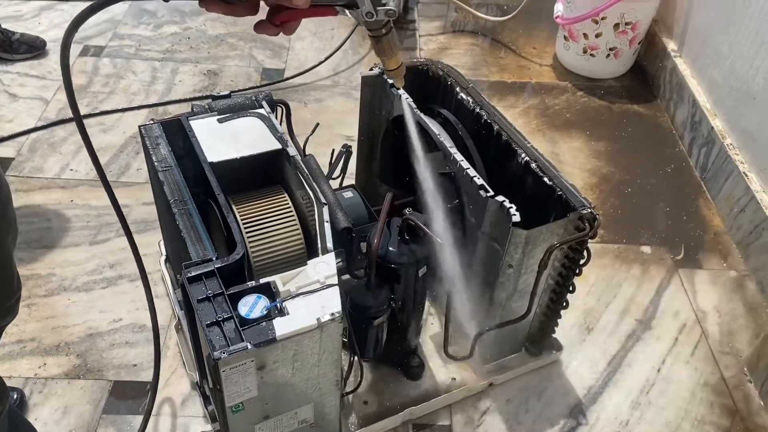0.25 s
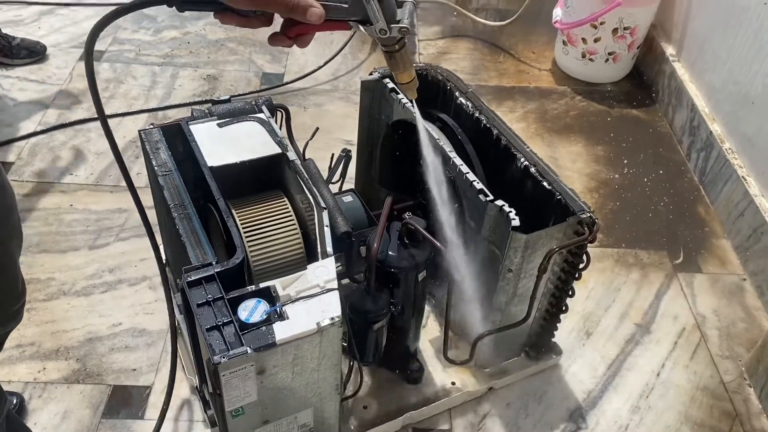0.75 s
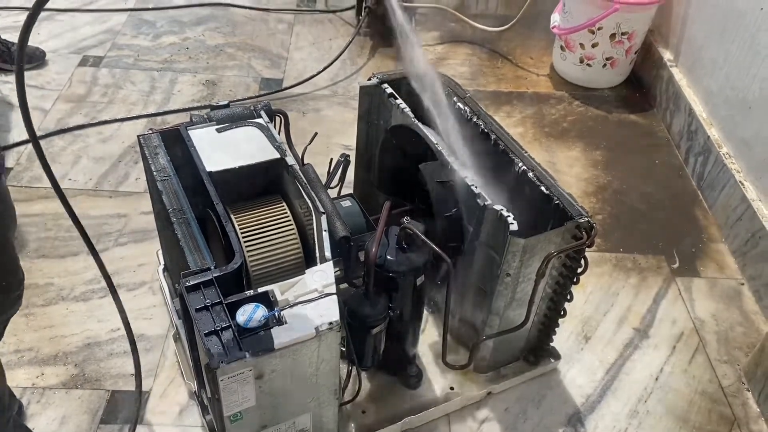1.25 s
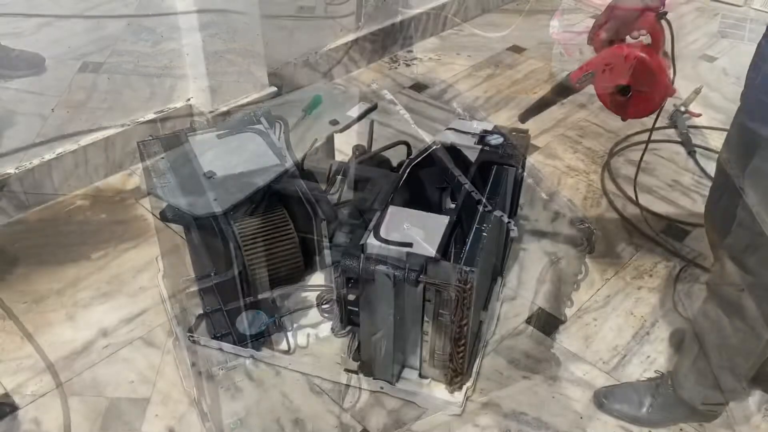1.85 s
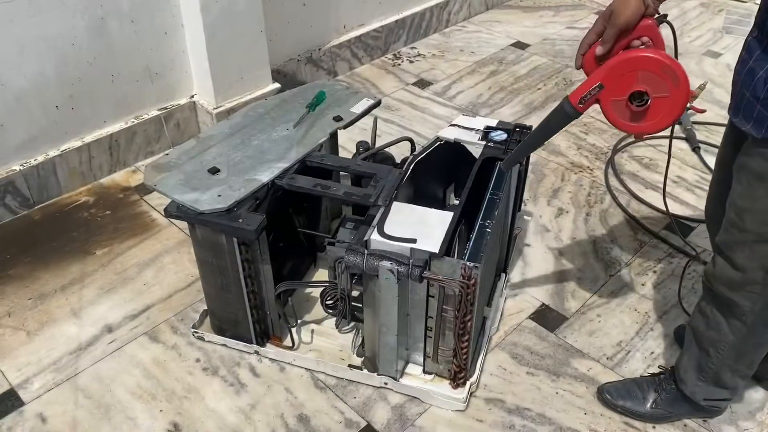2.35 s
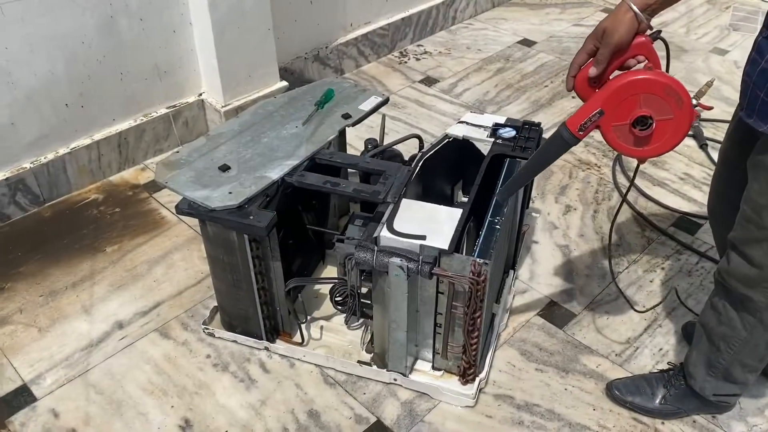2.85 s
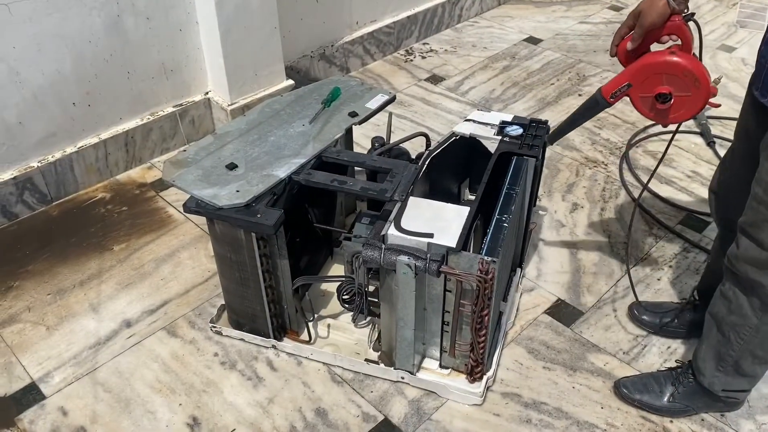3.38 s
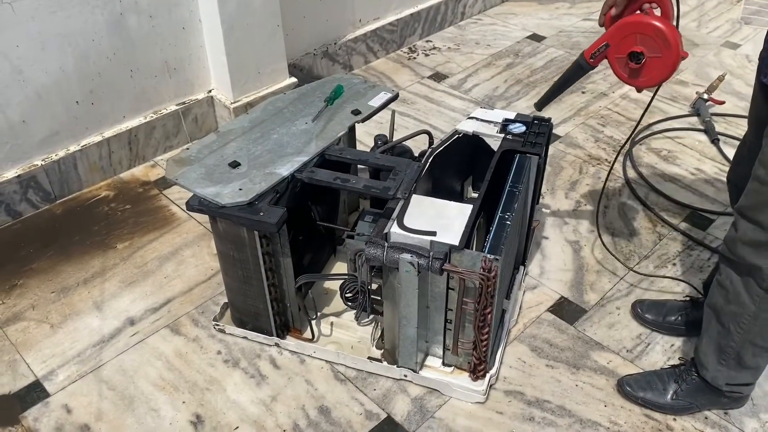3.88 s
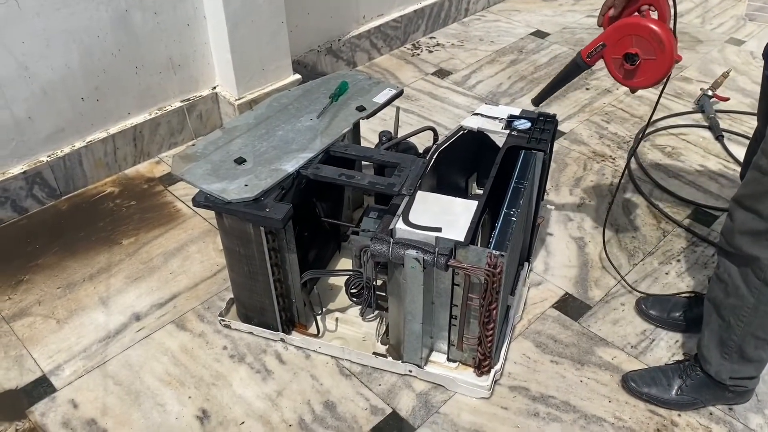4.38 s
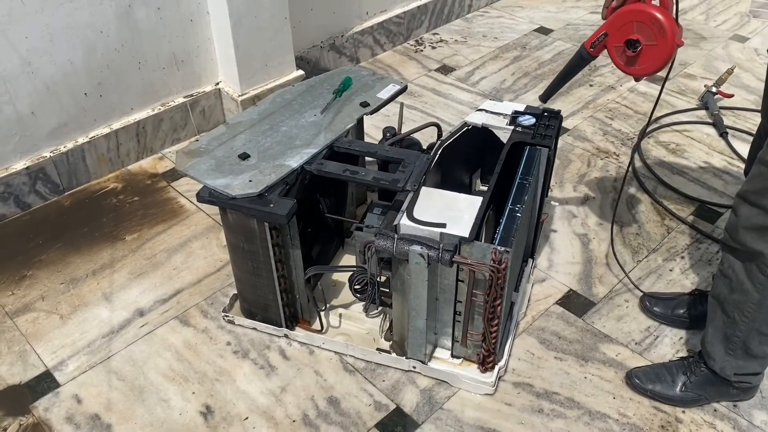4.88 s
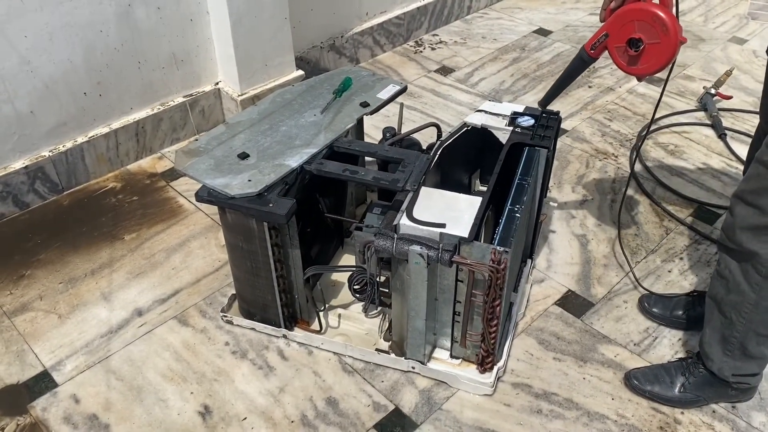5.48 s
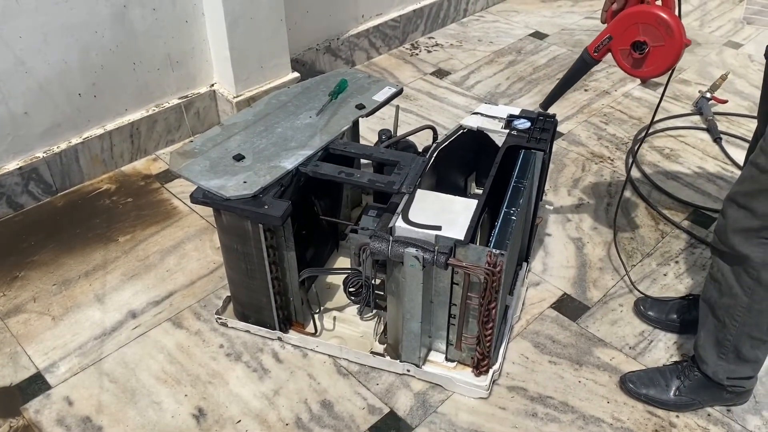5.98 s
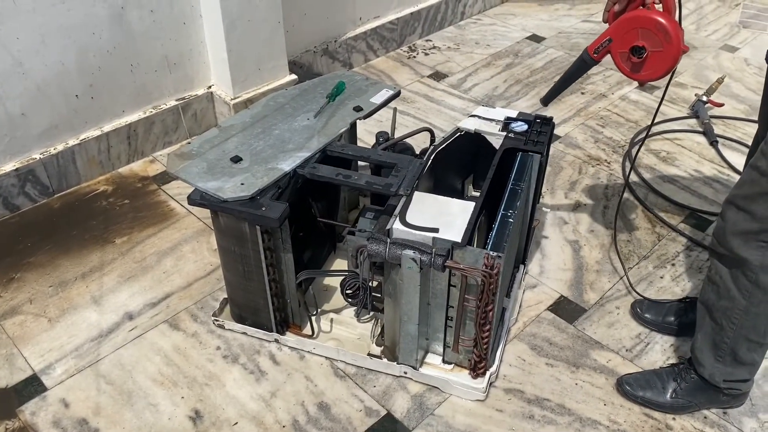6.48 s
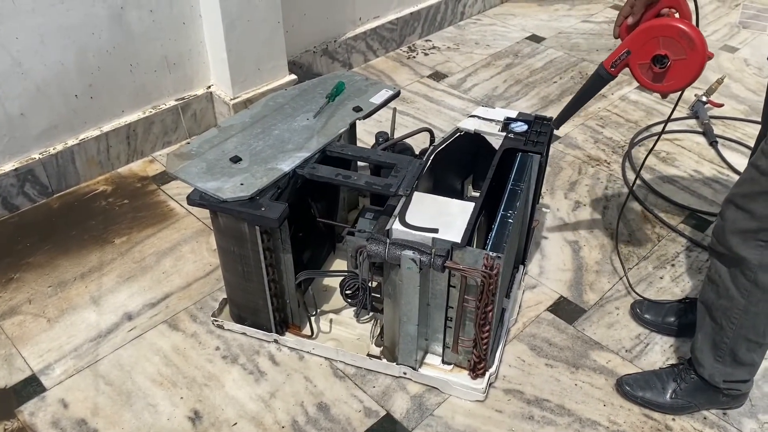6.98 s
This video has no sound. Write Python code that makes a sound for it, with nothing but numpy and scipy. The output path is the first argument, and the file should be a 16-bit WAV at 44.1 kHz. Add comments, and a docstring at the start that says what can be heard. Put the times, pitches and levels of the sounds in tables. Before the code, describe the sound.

A pressurized water jet hisses and splashes over a metal-finned appliance, then crossfades into a handheld electric blower's steady hum, whine and rushing air.

```python
"""Tiled floor among walls: a water jet sprays an appliance, then fades over to a handheld blower drying it.
Jet: shaped noise fizzes, splashes and drums; sweeps and water slugs ring the modes of a rim.
Blower: sines at shaft orders hum and whine (ten blades); noise makes rush, hiss, roar, rumble and gusts.
Faint treble noise runs throughout. The level drops out twice, very briefly."""
import sys
import numpy as np
from scipy import signal
from scipy.fft import rfft, irfft
from scipy.io import wavfile
from scipy.ndimage import uniform_filter1d

SR = 44100
rng = np.random.default_rng(int(sys.argv[2]) if len(sys.argv) > 2 else 0)


def store_wav(level_fs):
    """Save 16-bit WAV to argv[1]."""
    pcm = np.round(np.clip(np.atleast_2d(level_fs), -1, 1) * 32767)
    wavfile.write(sys.argv[1], SR, pcm.T.astype(np.int16))


N = 318843

# Noise spectra, relative: pitch_hz, level_db_per_hz
FIZZ = [(1470, -28), (2500, -5), (2750, -12), (3430, -10), (4430, -9), (6200, -10), (8300, -23.5),
        (10800, -99), (18300, -120)]
SPLASH = [(180, -46), (300, -6), (490, -3.5), (648, -7), (721, -4.5), (935, -6.5), (1360, -8),
          (3000, -19.5), (3900, -48), (6600, -120)]
DRUM = [(15, -48), (25, -29), (59, -7.5), (151, 1), (215, -4), (254, -4.5), (350, -24), (460, -42),
        (770, -120)]
RUSH = [(500, -51), (800, -22), (1000, -6), (1500, 1.5), (2000, 0.5), (2120, -7.5), (2300, 1), (2700, -5.5),
        (3000, -7), (4000, -46), (6000, -100)]
HISS = [(1680, -30.5), (2850, -4), (2890, -7.5), (3120, -2), (3530, -8.5), (3950, -8.5), (4400, -13.5),
        (4790, -15), (5240, -13.5), (5650, -15), (5750, -16), (7940, -23), (8300, -29.5), (10800, -111),
        (18300, -120)]
ROAR = [(60, -34), (110, -30), (170, -9.5), (250, -1.5), (400, 7), (600, 1.5), (900, 5.5), (1300, -2.5),
        (2000, -30), (4000, -96)]
RUMBLE = [(15, -52), (25, -14), (46, -15), (102, 5.5), (145, 1.5), (184, 4), (230, -17), (300, -30),
          (510, -120)]
TREBLE = [(7500, -40), (9400, -25), (9900, 6.5), (12100, 0), (12700, -19), (14500, -6.5), (16000, -21)]
# Likeness of the ears: pitch_hz, correlation
SPRAY_SAME = [(60, 0.88), (180, -0.72), (550, 0.086), (1650, 0.31), (4970, 0.266), (15000, -0.83)]
AIR_SAME = [(60, 0.94), (130, 0.78), (290, 0.95), (640, 0.48), (1410, 0.86), (3100, 0.49), (6820, 0.14),
            (15000, 0.92)]
BASS_SAME = [(30, .85), (100, .93), (300, .9)]
# Balance of the ears: pitch_hz, left_minus_right_db
SPRAY_PAN = [(60, -4.5), (180, 4.5), (550, -2.5), (1650, 2), (4970, 0.5), (15000, -2)]
AIR_PAN = [(60, -13), (110, -2.5), (200, -4), (380, -6), (700, -3), (1290, -0.5), (2380, -1.5), (4400, 4),
           (8120, 2.5), (15000, -8)]
# Phase between the ears: pitch_hz, left_lead_rad
AIR_LEAD = [(100, -1.5), (600, 0.63), (2670, 0.61), (3880, 0.1), (5430, 1.2), (7000, -1.1), (8400, -3.5)]

# Jet force, surging as it swings over the rim: time_s, force_db
JET_FORCE = [(0, 0.5), (.2, 0), (.27, 3), (.34, -0.5), (1.06, 2.5), (1.095, 1), (1.125, 6.5), (1.245, 9.5),
             (1.31, 1.5), (1.42, 5), (1.7, -1)]
MAIN_HZ = 1135  # rim mode that every sweep rings
# Rim modes: pitch_hz, width_hz, level_db
RIM_MODES = [(706, 60, -4), (870, 45, -3), (MAIN_HZ, 50, 0), (1490, 45, -1), (1955, 45, -9), (2370, 80, -4)]
# Jet sweeps over the rim: start_s, length_s, main_mode_db, other_modes_db, other_tilt_db_per_octave
SWEEPS = [(1.105, 0.09, -41, -4.5, -2), (1.2, .065, -36, -4, 4), (1.263, 0.1, -39, -22.5, 4),
          (1.372, .06, -42, -22, 2.5)]
# Water slugs striking the rim: start_s, main_mode_peak_db, other_modes_db, other_tilt_db_per_octave
SLUGS = [(1.110, -27, -8, -6), (1.123, -36, 1, -6), (1.141, -27.5, -5, -1), (1.163, -30, -9, -5),
         (1.18, -34, 5, -2), (1.207, -26, -1.5, 4), (1.222, -27, -6, 4), (1.237, -28, -7, 8),
         (1.252, -33, -4, 9), (1.272, -34, -15, 1), (1.292, -36, -15, 0), (1.316, -29, -18, 0),
         (1.384, -24.5, -21, 5), (1.408, -33, -19, 3), (1.444, -36, -14, 2)]

# Blower aimed into and over the hollows: time_s, shaft_hum_db, rush_db, roar_db
BLOWER = [(1.25, -56.5, -35, -45), (1.4, -40, -25, -41), (1.48, -41, -26.5, -26.5),
          (1.66, -32.5, -27.5, -30), (2.0, -29.5, -28, -32.5), (2.27, -23, -30, -24.5),
          (2.64, -23.5, -29.5, -28), (2.69, -23.5, -27.5, -26), (2.745, -24, -24, -22.5),
          (2.83, -24, -26.5, -24.5), (3.03, -25, -30, -26.5), (3.3, -29.5, -27.5, -31),
          (3.7, -28, -24, -32), (4.3, -29.5, -26, -33.5), (4.55, -31.5, -26.5, -32.5),
          (5.26, -27, -24.5, -33), (5.75, -27.5, -26.5, -32), (6.35, -29, -26, -32.5),
          (6.76, -28.5, -24.5, -33), (6.9, -28, -27, -34), (6.985, -26.5, -27.5, -33),
          (7.01, -28, -25.5, -32), (7.08, -25.5, -23.5, -31.5), (7.23, -28, -26, -30)]
# Resonances of the blower tube, of its dead spot (one row) and of the nozzle: pitch_hz, width_hz, gain_db
TUBE = [(1243, 280, 6), (1844, 64, 2), (2300, 190, 2), (1500, 120, -2), (949, 59, 5)]
TUBE_DEAD_SPOT = (2120, 90, -3)
NOZZLE = [(3210, 52, -3), (3930, 150, 1.5), (4303, 74, -2.5), (4740, 220, 3.5)]
# Eddies singing in the tube: pitch_hz, width_hz, level_re_rush_db
EDDIES = [(956, 46, -18), (1203, 58, -14.5), (1297, 39, -14), (1795, 50, -15), (1897, 63, -17.5),
          (2346, 50, -16.5), (2460, 48, -19.5), (3125, 220, -14.5)]
# Gusts as the air jet crosses an edge: start_s, length_s, pitch_hz, width_hz, level_db
GUSTS = [(1.85, 0.265, 2580, 800, -32), (2.03, 0.055, 1300, 250, -30), (2.103, 0.075, 1200, 400, -21),
         (2.113, 0.087, 730, 140, -25), (2.15, 0.21, 2070, 200, -33), (2.2, 0.19, 1430, 250, -27),
         (2.703, 0.039, 680, 250, -20.5), (2.755, 0.025, 560, 200, -21), (2.765, .03, 2500, 200, -26),
         (2.803, .025, 850, 200, -24), (2.735, 0.075, 1500, 600, -25), (2.735, 0.1, 2400, 1100, -25.5),
         (2.68, 0.25, 4500, 1400, -36), (2.82, 0.03, 1400, 200, -23.5), (2.84, .065, 1680, 200, -27),
         (2.905, 0.043, 850, 300, -21), (2.945, 0.043, 1300, 400, -25), (3.375, 0.067, 2100, 950, -19.5),
         (4.28, 0.08, 1800, 250, -24.5), (4.28, 0.09, 2440, 300, -26), (4.45, 0.085, 2750, 700, -26),
         (4.58, 0.09, 1300, 200, -26), (4.85, .08, 1300, 200, -25.5), (5.055, 0.078, 2840, 700, -22),
         (5.4, .04, 1900, 200, -27), (5.22, .07, 1800, 200, -27), (5.17, 0.19, 2460, 620, -24.5),
         (5.3, 0.28, 1820, 430, -25), (6.065, .05, 1860, 250, -24.5), (6.19, 0.042, 1830, 250, -24.5),
         (6.1, .12, 2470, 400, -29), (6.912, 0.024, 1720, 120, -22.5), (6.932, 0.02, 550, 350, -25),
         (6.995, 0.048, 2040, 100, -23), (6.995, 0.075, 2430, 130, -24), (6.993, .022, 1400, 150, -23),
         (6.75, .06, 1250, 250, -28), (7.065, .05, 1480, 120, -26), (7.115, .04, 1470, 120, -23),
         (7.085, .05, 2170, 300, -25), (6.97, .22, 5200, 500, -39)]
# Shaft speed: time_s, turns_hz
SHAFT = [(1.2, 274.8), (2.35, 274.9), (2.5, 274.5), (2.88, 273.9), (3.15, 273.5), (3.6, 273.9),
         (4.5, 274.15), (5.0, 273.8), (6.2, 273.5), (7.23, 273.6)]
# Stereo place of orders 1, 10, 2, 20: order, left_minus_right_db, left_lead_rad, wander_rad
ORDER_PLACES = [(1, -5.5, -.25, .06), (10, -2, -.9, .25), (2, 4, 1.1, .3), (20, 6, .5, .8)]
# Blade whine, order 10: time_s, level_db
WHINE = [(1.255, -52), (1.28, -43), (1.35, -41.5), (1.4, -38.5), (1.6, -30.5), (1.85, -29), (2.06, -27.5),
         (2.18, -33), (2.25, -25.5), (2.48, -28), (2.53, -36), (2.6, -52), (2.67, -37), (2.71, -41),
         (2.775, -32), (2.8, -40), (2.855, -39), (2.875, -31), (2.94, -26.5), (3.1, -31), (3.42, -26),
         (3.58, -32.5), (3.63, -29.5), (3.89, -35), (4.05, -32.5), (4.4, -33), (4.48, -34), (4.56, -33.5),
         (4.89, -29.5), (4.96, -32.5), (5.07, -26.5), (5.25, -28.5), (5.3, -29), (5.51, -26.5),
         (6.07, -29.5), (6.12, -27), (6.36, -30), (6.7, -28.5), (7.05, -29), (7.23, -34)]
# Order 2, weak while the tool points into the hollows: time_s, level_db
SECOND = [(1.25, -65), (1.95, -39), (2.3, -45), (3.05, -46), (3.35, -38.5), (5.3, -38.5), (6.5, -42.5),
          (7.23, -36.5)]
# Whine overtone, order 20: time_s, level_db
OVERTONE = [(1.3, -60), (1.43, -50), (1.52, -51), (1.62, -44.5), (1.87, -58), (1.96, -43), (2.04, -55),
            (2.075, -43), (2.13, -48), (2.21, -50), (2.25, -42), (2.31, -53), (2.335, -42), (2.38, -49),
            (2.43, -42), (2.5, -52), (2.54, -56), (2.565, -43), (2.7, -54), (2.84, -49), (2.94, -46),
            (3.0, -51), (3.18, -39.5), (3.3, -48), (3.42, -57), (3.46, -38), (3.52, -44), (3.58, -52),
            (3.89, -45), (4.05, -47.5), (4.4, -45.5), (4.5, -47.5), (4.9, -46), (5.3, -43.5), (5.51, -47.5),
            (6.1, -45.5), (6.4, -57.5), (6.62, -54), (6.75, -44.5), (7.05, -45), (7.23, -50)]
# Faint shaft orders: order, level_db
FAINT_ORDERS = [(5, -43), (8.5, -47)]

# Echoes off tiles and walls: delay_s, level_db
WALLS = [(.0043, -22), (.0078, -21), (.0131, -21), (.0187, -22), (.0262, -22), (.0355, -23), (.049, -25)]
# Dropouts: start_s, end_s
DROPOUTS = [(3.2227, 3.2438), (3.266, 3.2906)]

FIZZ_DB, SPLASH_DB, DRUM_DB = -41, -33.5, -36.5  # at force 0 dB
SPLASH_FOLLOWS, DRUM_FOLLOWS = 0.34, 0.3  # share of force_db
SPRAY_FULL_S, SPRAY_END_S = 1.0, 2.2
PUMP_HZ, PUMP_DEPTH = 100, 0.54
SLUG_RISE_S, SLUG_T60_S, SLUG_SPREAD_DB = .003, .065, 1.5
SLUG_DETUNE, SLUG_LEAD_RAD = .017, .35  # detune: share of pitch

HISS_DB, HISS_FOLLOWS = -32.5, 0.72  # at rush -25 dB; share of rush_db
RUMBLE_DB, RUMBLE_FOLLOWS = -47.5, 0.93  # at roar -32 dB; share of roar_db
TREBLE_DB = -64.5
EDDY_SWAY, EDDY_WANDER_DB, EDDY_SAME = .008, 2.5, .75  # share of pitch, dB, correlation
GUST_LEAN = .62  # below 1: faster rise than fall
SECOND_WANDER_DB, WHINE_WANDER_DB, OVERTONE_WANDER_DB = 2, 0.05, 1.3
HUM_DIP_S, HUM_DIP_LENGTH_S, HUM_DIP_DB = 2.798, 0.0079, -14
DROPOUT_GAIN, EDGE_HZ = 0.0013, 16400


def amp(db):
    """Amplitude from decibels."""
    return 10 ** (np.asarray(db) / 20)


def evened(x):
    """Scale to rms 1."""
    return x / np.sqrt(np.mean(x ** 2) + 1e-20)


def read(points, hz):
    """Interpolate a table over log frequency."""
    f, value = np.transpose(points)
    return np.interp(np.log(hz + 1), np.log(f + 1), value)


def curves(rows):
    """Each column of a timed table, sample by sample."""
    s, *columns = np.transpose(rows)
    return [np.interp(np.arange(N) / SR, s, c) for c in columns]


def fade(start_s, end_s):
    """Ramp from 0 at start_s to 1 at end_s; falls if end_s is earlier."""
    return np.clip((np.arange(N) / SR - start_s) / (end_s - start_s), 0, 1)


def drift(top_hz, low_hz=0.308):
    """Slow random wander of rms 1: sines at random phase, weaker with frequency."""
    t = np.arange(0, N + 64, 64) / SR
    slow = 0
    for f in np.geomspace(low_hz, top_hz, 40):
        slow = slow + np.sin(2 * np.pi * (f * t + rng.random())) / np.sqrt(f)
    return evened(np.interp(np.arange(N) / SR, t, slow))


def resonances(peaks, hz):
    """Summed gain_db of resonant bumps."""
    return sum(gain_db / (1 + ((hz - f) / width) ** 2) for f, width, gain_db in peaks)


def noise(colour, same, pan, lead=((0, 0), (1, 0)), peaks=(), patchy_db=2., flicker_db=-6.0):
    """Turbulent stereo noise, mid rms 1: patches drift in time and pitch, all pitches share a flicker."""
    frames, hz = N // 128 + 5, np.fft.rfftfreq(512, 1 / SR)
    a, b, c, d, patches = rng.standard_normal((frames, 257, 5)).T
    patches = uniform_filter1d(patches, size=3, axis=0)
    patches = evened(uniform_filter1d(patches, size=20, axis=1))
    flicker = evened(uniform_filter1d(rng.standard_normal(frames), size=12))
    like = np.clip(read(same, hz), -1, 1)[:, None]
    left = a + 1j * b
    right = like * left + np.sqrt(1 - like ** 2) * (c + 1j * d)
    right = right * np.exp(-1j * read(lead, hz))[:, None]
    tilt = amp(read(pan, hz) / 2)[:, None]
    z = np.array([left * tilt, right / tilt]) * amp(patchy_db * patches + flicker_db * flicker)
    x = signal.istft(z, nperseg=512, noverlap=384)[1][:, :N]
    fine_hz = np.fft.rfftfreq(N, 1 / SR)
    x = irfft(rfft(x) * amp(read(colour, fine_hz) + resonances(peaks, fine_hz)), N)
    return x / np.sqrt(np.mean(x.mean(0) ** 2))


def bursts(rows, same, peaks=()):
    """Short swells of noise, each in one resonance."""
    out, hz = np.zeros((2, N)), np.fft.rfftfreq(16384, 1 / SR)
    colour = amp(resonances(peaks, hz))
    for start_s, length_s, centre_hz, width_hz, db in rows:
        a, b = rng.standard_normal((2, 16384))
        pair = np.array([a, same * a + np.sqrt(1 - same ** 2) * b])
        band = 1 / (1 + ((hz - centre_hz) / width_hz) ** 2) ** 2
        pair = irfft(rfft(pair) * colour * band)
        u = np.arange(16384) / SR / length_s
        swell = np.sin(np.pi * np.minimum(u, 1) ** GUST_LEAN)
        pair *= swell / np.sqrt(np.mean((pair * swell) ** 2) / np.mean(swell ** 2))
        part = out[:, round(start_s * SR):][:, :16384]
        part += amp(db) * pair[:, :part.shape[1]]
    return out


def treble():
    """Faint top noise, partly opposed between the ears."""
    same, pan = [(8000, -.4), (15000, -.4)], [(8000, 0), (15000, 0)]
    return amp(TREBLE_DB) * noise(TREBLE, same, pan, patchy_db=3., flicker_db=1.)


def fizz(force_db):
    """Droplets: bright noise following the full force."""
    return amp(FIZZ_DB + force_db) * noise(FIZZ, SPRAY_SAME, SPRAY_PAN, patchy_db=2.0, flicker_db=1.0)


def splash(force_db):
    """Jet on the casing: mid-band noise."""
    level = amp(SPLASH_DB + SPLASH_FOLLOWS * force_db)
    return level * noise(SPLASH, SPRAY_SAME, SPRAY_PAN, patchy_db=2.0, flicker_db=1.0)


def drum(force_db):
    """Jet drumming the panels: low noise, nearly alike in both ears."""
    level = amp(DRUM_DB + DRUM_FOLLOWS * force_db)
    return level * noise(DRUM, BASS_SAME, SPRAY_PAN, patchy_db=-0.1, flicker_db=-1.1)


def spray():
    """Water jet: three force-driven noises, faded out, plus the ringing rim."""
    force_db = curves(JET_FORCE)[0]
    jet = fizz(force_db) + splash(force_db) + drum(force_db)
    return jet * fade(SPRAY_END_S, SPRAY_FULL_S) + rim() + slugs()


def other_modes(hz, offset_db):
    """Apply offset_db to every mode but the main one."""
    return (hz != MAIN_HZ) * offset_db


def rim():
    """Sweeps excite the rim modes as noise bands; the pump beats in them."""
    rows = []
    for start_s, length_s, db, other_db, tilt_db in SWEEPS:
        for hz, width_hz, mode_db in np.array(RIM_MODES):
            offset_db = other_db + tilt_db * np.log2(hz / MAIN_HZ)
            rows.append((start_s, length_s, hz, width_hz, db + mode_db + other_modes(hz, offset_db)))
    beat = np.cos(2 * np.pi * PUMP_HZ * np.arange(N) / SR)
    return bursts(rows, 0.7) * (1 + PUMP_DEPTH * beat)


def slugs():
    """Each slug knocks the rim: decaying modes, randomly detuned, with random phase between the ears."""
    out, t = np.zeros((2, N)), np.arange(6000) / SR
    hz, _, mode_db = np.transpose(RIM_MODES)[:, :, None]
    shape = (1 - np.exp(-t / SLUG_RISE_S)) * amp(-60 * t / SLUG_T60_S)
    for start_s, db, other_db, tilt_db in SLUGS:
        spread, detune, lead = rng.standard_normal((3, len(RIM_MODES), 1))
        offset_db = other_db + tilt_db * np.log2(hz / MAIN_HZ) + SLUG_SPREAD_DB * spread
        level = amp(db + mode_db + other_modes(hz, offset_db))
        for ear in (0, 1):
            phase = 2 * np.pi * hz * (start_s + t + SLUG_DETUNE * detune * t)
            ring = level * np.sin(phase + SLUG_LEAD_RAD * ear * lead)
            out[ear, round(start_s * SR):][:len(t)] += ring.sum(0) * shape / shape.max()
    return out


def rush(rush_db):
    """Fan air in the tube: noise through the tube resonances."""
    return amp(rush_db) * noise(RUSH, AIR_SAME, AIR_PAN, AIR_LEAD, TUBE, patchy_db=1.5, flicker_db=0.8)


def eddies(rush_db):
    """Eddies sing in the tube: narrow noise bands, swaying in pitch, fluttering in level."""
    out = np.zeros((2, N))
    for hz, width_hz, db in EDDIES:
        a, b, c, d = rng.standard_normal((4, N))
        left = a + 1j * b
        right = EDDY_SAME * left + np.sqrt(1 - EDDY_SAME ** 2) * (c + 1j * d)
        # two-pole lowpass, then shifted up to the pitch
        pole = np.exp(-np.pi * width_hz / SR)
        slow = signal.lfilter([1], np.poly([pole, pole]), np.array([left, right]))
        pitch_hz = hz * (1 + EDDY_SWAY * drift(3., .4))
        turn = np.exp(2j * np.pi * np.cumsum(pitch_hz) / SR)
        level = amp(db + rush_db + EDDY_WANDER_DB * drift(25., 1.5))
        out += level * evened((slow * turn).real)
    return out


def hiss(rush_db):
    """Nozzle: bright resonant noise following part of the rush."""
    level = amp(HISS_DB + HISS_FOLLOWS * (rush_db + 25))
    return level * noise(HISS, AIR_SAME, AIR_PAN, AIR_LEAD, NOZZLE, patchy_db=0.4, flicker_db=0.74)


def roar(roar_db):
    """Air jet entering a hollow: low-mid noise."""
    return amp(roar_db) * noise(ROAR, AIR_SAME, AIR_PAN, AIR_LEAD, patchy_db=0.62, flicker_db=0.82)


def rumble(roar_db):
    """Bass noise following most of the roar."""
    level = amp(RUMBLE_DB + RUMBLE_FOLLOWS * (roar_db + 32))
    return level * noise(RUMBLE, BASS_SAME, SPRAY_PAN, patchy_db=-1.5, flicker_db=-2.0)


def air():
    """Blower air: turbulence faded in, plus gusts."""
    _, rush_db, roar_db = curves(BLOWER)
    jet = rush(rush_db) + eddies(rush_db) + hiss(rush_db) + roar(roar_db) + rumble(roar_db)
    return jet * fade(1.23, 2.08) + gusts()


def motor():
    """Blower shaft: sines locked to its turning, fluttering in level and drifting between the ears."""
    turn, out = 2 * np.pi * np.cumsum(curves(SHAFT)[0]) / SR, np.zeros((2, N))
    ear = np.array([[.5], [-.5]])
    dip = np.exp(-((np.arange(N) / SR - HUM_DIP_S) / HUM_DIP_LENGTH_S) ** 2)
    hum_db = curves(BLOWER)[0] + HUM_DIP_DB * dip
    whine_db = curves(WHINE)[0] + WHINE_WANDER_DB * drift(30., 6.)
    second_db = curves(SECOND)[0] + SECOND_WANDER_DB * drift(20.0, 2.5)
    overtone_db = curves(OVERTONE)[0] + OVERTONE_WANDER_DB * drift(6.6, 3.)
    levels_db = hum_db, whine_db, second_db, overtone_db
    for (order, pan_db, lead_rad, wander), db in zip(ORDER_PLACES, levels_db):
        side_db = pan_db + 3.6 * wander * drift(2.3)
        ahead_rad = lead_rad + wander * drift(3.0)
        flutter_db = 1.2 * drift(60., 6.)  # eddies at the blades
        pair = amp(ear * side_db) * np.exp(1j * ear * ahead_rad)
        pair /= np.maximum(abs(pair.mean(0)), .6)  # even the mid level, within limits
        out += np.sqrt(2) * amp(db + flutter_db) * (pair * np.exp(1j * np.round(order) * turn)).real
    for order, db in FAINT_ORDERS:
        level = np.sqrt(2) * amp(db + 1.8 * drift(22.0))
        out += level * np.cos(order * turn + ear * drift(4.3)) * fade(1.74, 2.0)
    return out * fade(1.24, 1.241)


def gusts():
    """Air jet crossing edges: noise swells coloured by the tube and its dead spot."""
    return bursts(GUSTS, 0.5, list(TUBE) + [TUBE_DEAD_SPOT])


def yard(x):
    """Tiles and walls: echoes of alternating sign, three samples later in alternate ears."""
    taps = np.zeros((2, 4096))
    taps[:, 0] = 1
    for k, (delay_s, db) in enumerate(WALLS):
        late = np.array([k % 2, 1 - k % 2]) * 3
        taps[[0, 1], round(delay_s * SR) + late] = amp(db) * (-1) ** k
    return signal.oaconvolve(x, taps / np.linalg.norm(taps[0]), axes=1)[:, :N]


def scene():
    """Spray and air with echoes; motor and treble direct."""
    return treble() + yard(spray() + air()) + motor()


def record(dry):
    """Two short dropouts, then a lowpass."""
    t, on = np.arange(N) / SR, np.ones(N)
    for start_s, end_s in DROPOUTS:
        on[(t > start_s) & (t < end_s)] = DROPOUT_GAIN
    lowpass = signal.firwin(511, EDGE_HZ, window=("kaiser", 9), fs=SR)
    return signal.oaconvolve(dry * on, lowpass[None], "same")


dry = scene()
out = record(dry)
store_wav(out)
```